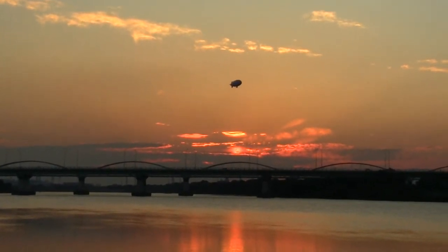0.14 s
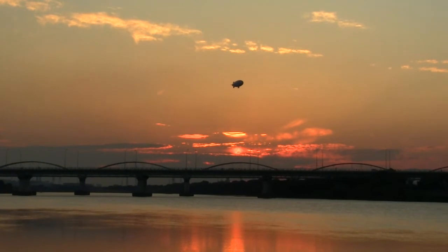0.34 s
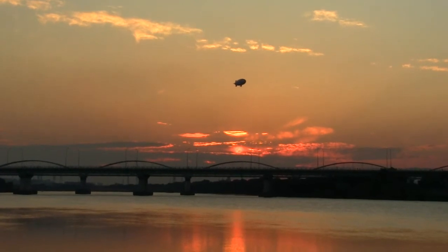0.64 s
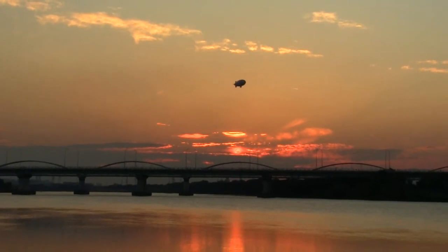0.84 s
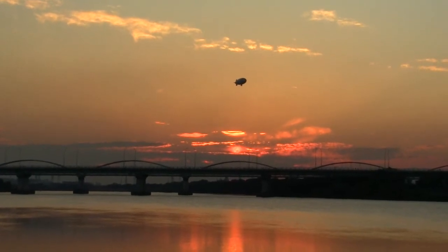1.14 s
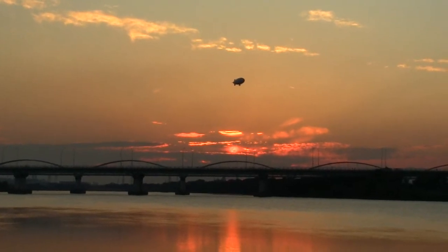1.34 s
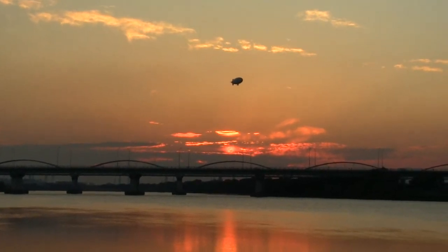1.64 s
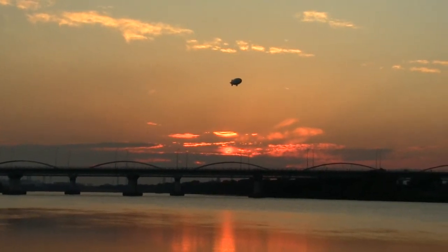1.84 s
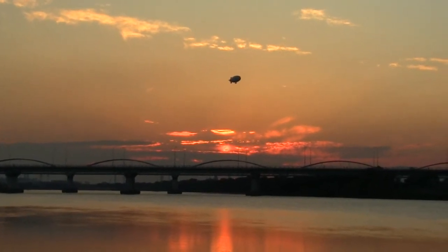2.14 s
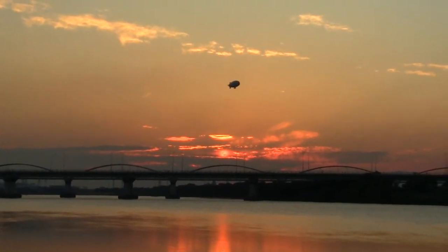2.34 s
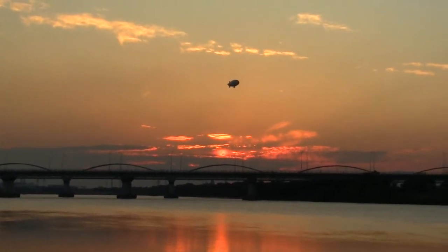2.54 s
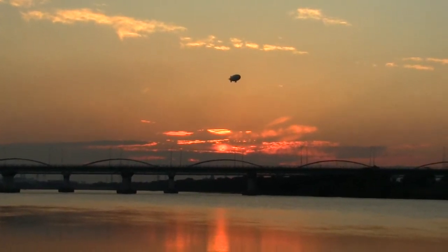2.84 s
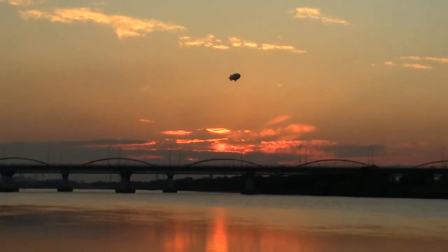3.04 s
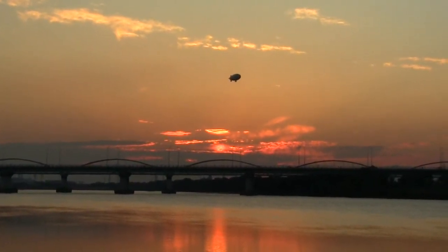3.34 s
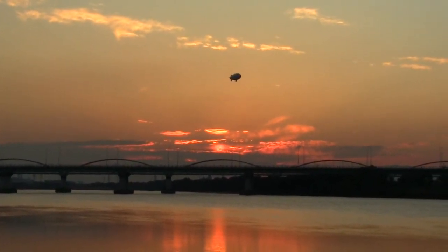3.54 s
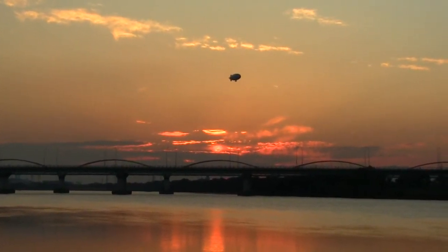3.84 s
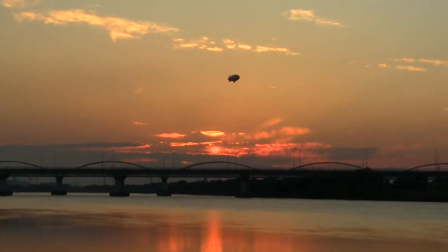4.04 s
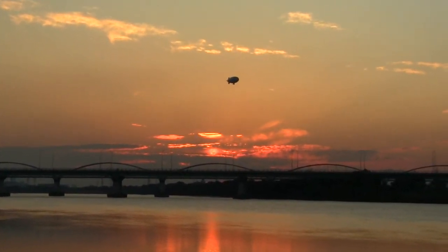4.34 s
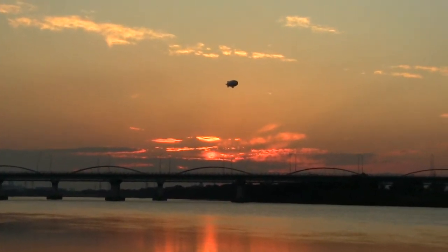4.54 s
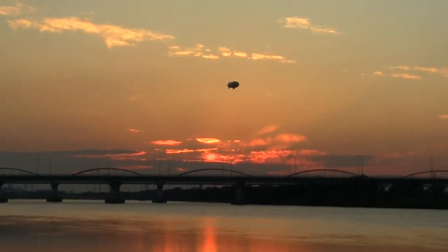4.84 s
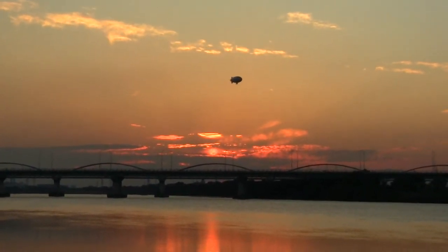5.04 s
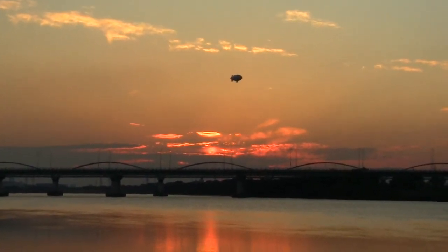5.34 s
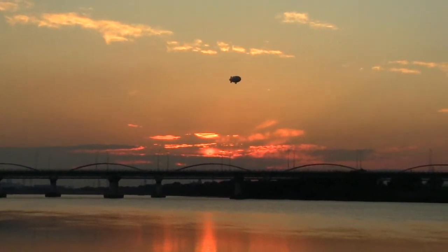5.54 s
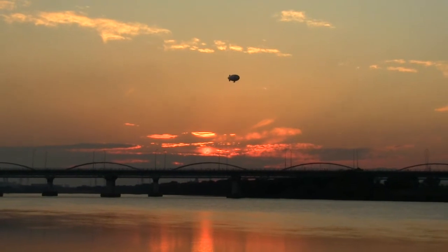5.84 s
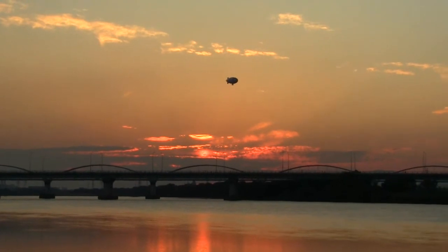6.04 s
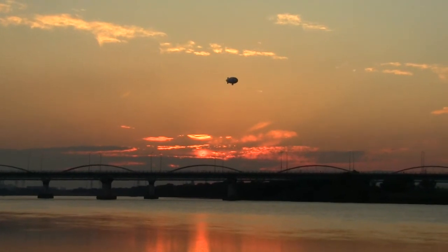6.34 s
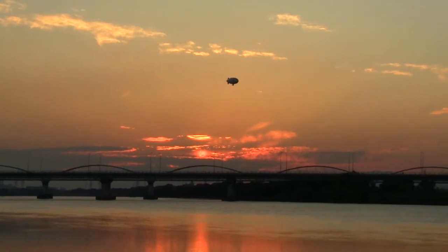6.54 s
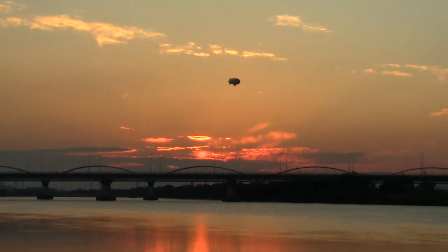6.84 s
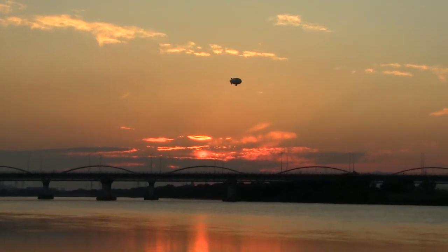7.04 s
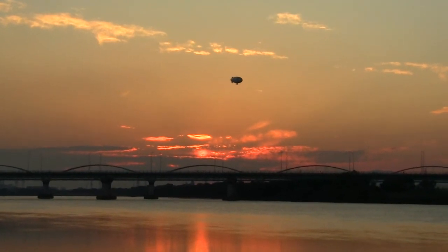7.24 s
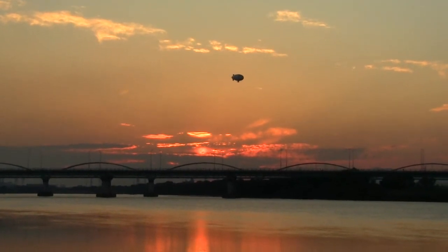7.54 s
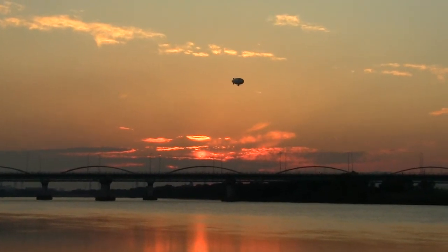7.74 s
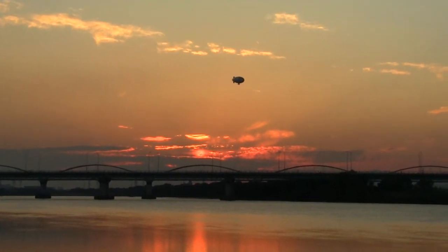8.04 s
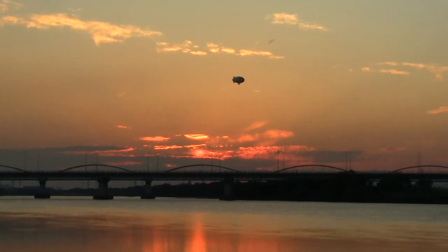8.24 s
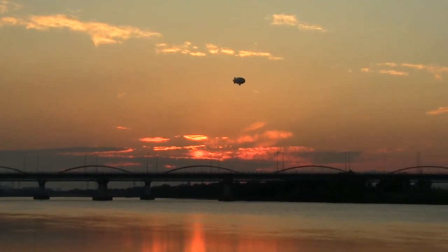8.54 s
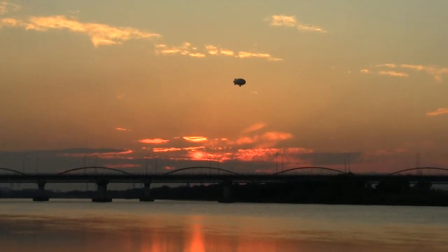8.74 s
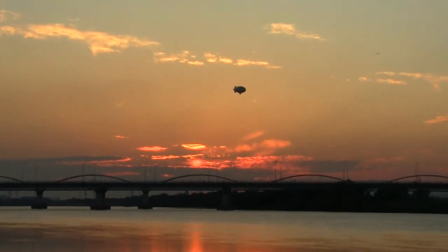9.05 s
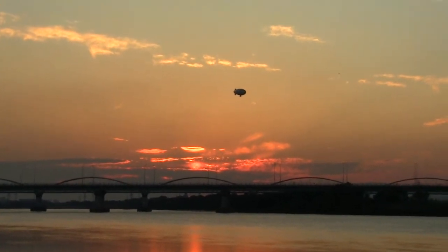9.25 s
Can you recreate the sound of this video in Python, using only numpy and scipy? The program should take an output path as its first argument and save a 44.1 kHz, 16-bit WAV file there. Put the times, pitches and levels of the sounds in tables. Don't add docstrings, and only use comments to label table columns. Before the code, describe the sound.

A constant high insect chorus fills the open evening air from start to finish. Sharp ringing chirps in groups of three or four come from nearby crickets, over a lower rapid trilling and dry, fast ticks. Very quietly below are a fluttering engine drone, a far motor hum passing in the first two seconds, distant rumble, and two dull handling knocks later. Close, almost mono pickup with little echo.

```python
import sys
import numpy as np
from scipy import signal
from scipy.fft import rfft, irfft
from scipy.io import wavfile
from scipy.ndimage import uniform_filter1d, map_coordinates

SR = 44100
rng = np.random.default_rng(int(sys.argv[2]) if len(sys.argv) > 2 else 0)


def volts_from_decibels(level):
    exponent = np.asarray(level, float) / 20
    return 10 ** exponent


def dump_mix(stems):
    frames = np.atleast_2d(stems).T
    limited = np.clip(frames, -1, 1)
    pcm = np.round(limited * 32767).astype(np.int16)
    wavfile.write(sys.argv[1], SR, pcm)


N = 413658

# (time from first full stroke [s], start pitch [Hz], level [dB], pitch fall [Hz])
SONG_MIDDLE = [
    (-.156, 5660, -21, 180),
    (0, 5668, -19.5, 105),
    (.0645, 5672, -19, 90),
    (.129, 5672, -19, 75),
]
SONG_HIGH = [
    (-.131, 5740, -26, 240),
    (0, 5790, -23, 190),
    (.0625, 5790, -22, 170),
    (.125, 5785, -21, 160),
]
SONG_LOW = [
    (-.119, 5545, -30, 190),
    (0, 5560, -25, 80),
    (.062, 5570, -23.5, 70),
    (.124, 5570, -22, 70),
]
SONG_DEEP = [
    (-.15, 5132, -31, 120),
    (0, 5180, -25, 45),
    (.062, 5215, -23, 75),
    (.124, 5225, -22.5, 85),
]
SONG_LEVEL = [
    (-.15, 5250, -30, 85),
    (0, 5285, -27.5, 70),
    (.0635, 5285, -25, 35),
    (.127, 5283, -24, 25),
]
# (time of first full stroke [s], phrase gain [dB], lead stroke gain [dB])
MIDDLE_PHRASES = [(.038, -0.5, 0.0), (.613, -0.5, -1.5), (1.499, -.5, -2.5), (2.101, -1.5, -0.3),
                  (3.326, -0.5, -2.5), (3.915, -1, 0.3), (5.096, -2.2, -5.5), (5.677, -1.3, -1.3),
                  (6.226, -0.3, .4), (7.18, 0.0, -5.5), (7.757, -1.7, -1), (8.358, -4.5, 0.5)]
HIGH_PHRASES = [(.337, -3, -1), (0.938, -1.4, -4.5), (1.548, -1, -1.3), (2.265, 0.1, -5.0), (2.795, 0.8, 3),
                (3.436, -0.1, -2.5), (3.994, -1.3, 2.5), (4.535, 0.8, 2), (5.166, -0.7, -0.3),
                (5.728, -1.3, 1.1), (6.329, -.4, 0.8), (7.004, 0.5, 0.2), (7.697, -1, -1),
                (8.324, 0.1, -3.0), (8.929, 0.7, -0.6)]
LOW_PHRASES = [(-.084, 1.5, 0.0), (1.039, 1.4, -30), (2.177, -5, 3), (2.848, 0.5, -0.5), (3.969, -1, -1),
               (4.654, -0.8, -1), (5.923, 0.6, -5.0), (6.476, -.4, -4), (8.34, -2.5, -5.5)]
DEEP_PHRASES = [
    (.323, -.3, .1),
    (2.089, -0.39, -.9),
    (2.63, -0.33, 2.4),
    (4.274, .3, -0.7),
    (4.831, .6, 1.01),
    (6.608, 0.7, 0.14),
    (7.206, 0.25, .1),
]
LEVEL_PHRASES = [(.326, -3, -4.0), (.944, -0.5, 0.5), (1.279, -12, -27), (2.301, -0.5, -1.5),
                 (2.867, -1.1, -5), (3.45, -0.3, 1.9), (4.865, 0.8, -2), (5.432, 1.5, 2.5),
                 (6.09, -12, -33), (6.931, 0.6, -2), (7.509, 1, -4.0), (9.354, 2, -3)]
# (time [s], start pitch [Hz], level [dB], pitch fall [Hz])
STRAYS = [
    (.922, 5550, -22, 200),
    (1.08, 5680, -23, 120),
    (2.287, 5680, -21, 40),
    (8.525, 5570, -24, 70),
]
# (first stroke [s], last stroke [s], level [dB])
RUNS = [(-.005, .085, -33), (.181, .361, -31.5), (.454, .544, -33), (1.39, 1.665, -32), (1.743, 1.79, -29),
        (1.862, 1.958, -30.5), (2.054, 2.098, -31), (2.587, 2.635, -32), (2.734, 3.055, -32.5),
        (3.154, 3.245, -31), (3.341, 3.382, -30), (3.898, 3.982, -34), (4.072, 4.302, -32),
        (4.394, 4.631, -31), (4.733, 4.778, -30), (5.302, 5.532, -32), (5.628, 5.806, -32.5),
        (5.868, 5.999, -32), (6.988, 7.081, -32), (7.169, 7.543, -32), (7.64, 7.685, -29.5),
        (7.782, 7.825, -33), (8.332, 8.656, -34.5), (8.756, 8.987, -32.5), (9.081, 9.124, -30),
        (9.223, 9.314, -32)]
# (first stroke [s], last stroke [s], level [dB])
DRAWLS = [
    (.889, 1.297, -31.5),
    (2.171, 2.523, -31),
    (3.458, 3.806, -29),
    (4.852, 5.203, -29),
    (6.302, 6.904, -29.5),
    (7.904, 8.241, -29),
]
# (first stroke [s], last stroke [s], level [dB])
SLOW_TRILLER = [
    (0.638, 1.131, -33.5),
    (3.656, 3.8, -33),
    (4.217, 4.505, -34),
    (5.72, 5.79, -36),
    (5.865, 6.003, -23),
    (6.28, 6.9, -34.5),
    (7.959, 8.172, -36),
]
# (first chirp [s], last chirp [s], level [dB])
TICKER = [
    (.052, .052, -32.5),
    (.198, .464, -34),
    (1.535, 1.535, -30),
    (1.643, 2.04, -31.5),
    (2.168, 2.7, -34),
    (4.098, 5.434, -33),
    (6.596, 7.651, -33.5),
    (8.831, 9.36, -31.5),
]
# (frequency shift [Hz], level [dB], blur [ratio])
IMAGES = [
    (3900, -35.5, .35),
    (5200, -53, 4),
    (5480, -54, 4),
    (6850, -41, .5),
    (7840, -45, .5),
]
# (time [s], firing rate [Hz], second order [dB], fourth order [dB])
ENGINE = [
    (0.0, 70.3, -53, -49),
    (0.13, 71.3, -51, -52.5),
    (4.78, 70.46, -55.5, -58),
    (6.19, 71.9, -52, -62.5),
    (9.09, 69.5, -56, -55),
    (9.38, 71.7, -54, -55),
]
# (time [s], pitch [Hz], level [dB])
HUM = [
    (0.3, 470, -55),
    (1.2, 469.7, -57),
    (1.5, 470, -51),
    (2.25, 470, -51),
    (2.35, 468, -62),
]
# (time [s], peak level [dB])
BUMPS = [
    (4.245, -44),
    (9.168, -37),
]
# (time [s], level [dB])
TOWN = [
    (0.0, -46.5),
    (0.81, -46.5),
    (9.38, -48),
]
# (frequency [Hz], density [dB per Hz])
AIR = [(20, -16), (60, -1), (140, -4.5), (480, -7), (1000, -11.5), (1600, -16.5), (2400, -9.5),
       (2800, -6.5), (4300, -14), (4850, -9), (6300, -10.5), (7600, -17.5), (8400, -27.5), (13000, -31)]
# (frequency [Hz], side minus mid [dB])
WIDTH = [
    (60, -5),
    (150, 0),
    (450, 1.5),
    (1300, 5.5),
    (3000, -12),
]


def stroke(hz, fall_hz, length, rise, fade, hook_hz):
    t = np.arange(int(length * SR)) / SR
    end = np.clip(1 - (length - t) / fade, 0, 1)
    shape = np.sin(np.pi / 2 * np.minimum(t / rise, 1)) ** 2 * np.cos(np.pi / 2 * end)
    pitch = hz - fall_hz * t / length - hook_hz * end ** 3
    return shape * np.exp(2j * np.pi * np.cumsum(pitch) / SR)


def strokes(rows, length, rise, fade, hook_hz, wobble_db, stretch=0, sag_db=0):
    out = np.zeros(N + 2 * SR, complex)
    for (s, hz, level_db, fall_hz), luck in zip(rows, rng.standard_normal((len(rows), 8))):
        one = stroke(hz, fall_hz, length + stretch * fall_hz, rise, fade, hook_hz)
        sagging_db = level_db - sag_db * fall_hz * np.linspace(-.4, .6, len(one))
        catch = np.interp(np.linspace(0, 6, len(one)), np.arange(7), luck[1:])
        at = int((s + 1) * SR)
        out[at:at + len(one)] += volts_from_decibels(sagging_db + wobble_db * catch) * one * np.exp(9j * luck[0])
    return out[SR:SR + N]


def phrases(song, rows):
    sag_hz_per_db = 22
    (lead_s, lead_hz, lead_db, lead_fall), *full = song
    leads = [(s + lead_s, lead_hz + sag_hz_per_db * soft_db, lead_db + soft_db, lead_fall)
             for s, _, soft_db in rows]
    rest = [(s + later, hz, level_db + gain_db, fall)
            for s, gain_db, _ in rows for later, hz, level_db, fall in full]
    return leads + rest


def crowd(count, per_s, hz, spread_hz, fall_hz, length, level_db, sway_db):
    out = np.zeros(N + SR, complex)
    for pitch, (pace, start) in zip(np.linspace(-1, 1, count), rng.random((count, 2))):
        at = np.arange(start / per_s, N / SR, 1 / (per_s * (.96 + .08 * pace)))
        sway = np.interp(4 * at, np.arange(40), rng.standard_normal(40))
        gain = volts_from_decibels(level_db + sway_db * sway) * np.exp(9j * rng.random(len(at)))
        one = stroke(hz + spread_hz * pitch, fall_hz, length, rise=.2 * length, fade=.49 * length, hook_hz=40)
        out[(at * SR).astype(int)[:, None] + np.arange(len(one))] += gain[:, None] * one
    return out[:N]


def ringers():
    sung = (STRAYS + phrases(SONG_MIDDLE, MIDDLE_PHRASES) + phrases(SONG_HIGH, HIGH_PHRASES)
            + phrases(SONG_LOW, LOW_PHRASES) + phrases(SONG_DEEP, DEEP_PHRASES)
            + phrases(SONG_LEVEL, LEVEL_PHRASES))
    rows = [(s - .003, hz + 8, level_db + 1.0, 1.212 * fall_hz) for s, hz, level_db, fall_hz in sung]
    near = strokes(rows, length=.054, rise=.007, fade=.02, hook_hz=300, wobble_db=2.0,
                   stretch=.00003, sag_db=.015)
    far = crowd(count=16, per_s=9.0, hz=5810, spread_hz=160, fall_hz=150, length=.05,
                level_db=-47.5, sway_db=3.5)
    far += crowd(count=22, per_s=8.0, hz=5396, spread_hz=283, fall_hz=107, length=.037,
                 level_db=-49.0, sway_db=7.0)
    far += crowd(count=5, per_s=30.0, hz=7150, spread_hz=750, fall_hz=250, length=.02,
                 level_db=-63, sway_db=8)
    return near + far


def runs(rows, gap):
    warm_up_db = -2.5
    out = []
    for first, last, level_db in rows:
        count = round((last - first) / gap) + 1
        for k, s in enumerate(np.linspace(first, last, count)):
            out.append((s, level_db + warm_up_db * np.exp(-k)))
    return out


def trillers():
    sung = runs(RUNS, gap=.046) + runs(DRAWLS, gap=.069)
    luck = rng.standard_normal((len(sung), 2))
    low = [(s - .005, 3915 + 30 * v, level_db + 4.0 + 1.1 * w, 380)
           for (s, level_db), (v, w) in zip(sung, luck)]
    high = [(s - .004, 4150, level_db, 600)
            for first, last, level_db in SLOW_TRILLER for s in np.arange(first, last + .03, .07)]
    near = strokes(low + high, length=.0382, rise=.0086, fade=.014, hook_hz=60, wobble_db=-1.5)
    weak = crowd(count=5, per_s=22.0, hz=3800, spread_hz=80, fall_hz=280, length=.03,
                 level_db=-46.5, sway_db=2.2)
    fast = crowd(count=18, per_s=43.0, hz=3344.4, spread_hz=70.7, fall_hz=231, length=.0166,
                 level_db=-39.5, sway_db=3.0)
    single = crowd(count=1, per_s=33.0, hz=3750, spread_hz=0, fall_hz=230, length=.022,
                   level_db=-36, sway_db=1.5)
    return near + weak + fast + single


def ticker():
    chirps = runs(TICKER, gap=.133)
    rows = [(s + .0142 * k - .003, 5480, level_db, 1200) for s, level_db in chirps for k in range(4)]
    return strokes(rows, length=.012, rise=.003, fade=.008, hook_hz=50, wobble_db=3)


def grass(x, t60, level_db):
    t = np.arange(int(.3 * SR)) / SR
    tail = rng.standard_normal(len(t)) * volts_from_decibels(-60 * t / t60)
    return x + volts_from_decibels(level_db) * signal.fftconvolve(x, tail / np.linalg.norm(tail))[:N]


def recorder_images(loud):
    t = np.arange(N) / SR
    shiver = drift(220) + 1j * drift(200)
    shifts = sum(volts_from_decibels(level_db) * (1 + blur * shiver) * np.exp(2j * np.pi * hz * t)
                 for hz, level_db, blur in IMAGES)
    deep = signal.sosfilt(signal.ellip(6, 1, 28, 5230, fs=SR, output="sos"), loud)
    overtone = volts_from_decibels(-12) * deep ** 2 * (1 + .4 * shiver)
    mirror = volts_from_decibels(-41) * np.conj(deep) * np.exp(2j * np.pi * 16980 * t)
    return loud * shifts + overtone + mirror


def airship():
    t = np.arange(N) / SR
    s, hz, second_db, fourth_db = np.transpose(ENGINE)
    turn = 2 * np.pi * np.cumsum(np.interp(t, s, hz) + .295 * drift(5.0)) / SR
    even = volts_from_decibels(np.interp(t, s, second_db)) * np.sin(2 * turn)
    even += volts_from_decibels(np.interp(t, s, fourth_db)) * np.sin(4 * turn)
    even *= volts_from_decibels(2.5 * drift(6.0) - 1)
    rest = sum(volts_from_decibels(level_db + 3 * drift(2.5)) * np.sin(k * turn)
               for k, level_db in zip((1, 3, 5, 6), (-65, -61, -63, -65)))
    return np.sqrt(2) * (even + rest)


def passing_motor():
    t = np.arange(N) / SR
    s, hz, level_db = np.transpose(HUM)
    turn = 2 * np.pi * np.cumsum(np.interp(t, s, hz)) / SR
    return np.sqrt(2) * volts_from_decibels(np.interp(t, s, level_db, -99, -99)) * np.sin(turn)


def bumps():
    t = np.arange(N) / SR
    hz, length_s = 58, .037
    out = np.zeros(N)
    for s, peak_db in BUMPS:
        hump = np.sin(np.pi * np.clip((t - s) / length_s, 0, 1))
        out += volts_from_decibels(peak_db) * np.sin(2 * np.pi * hz * (t - s)) * hump
    return out


def town_air():
    t = np.arange(N) / SR
    level = volts_from_decibels(np.interp(t, *np.transpose(TOWN)) + 6.5)
    wide = [(hz, level_db + at_hz(WIDTH, hz)) for hz, level_db in AIR]
    mid = level * volts_from_decibels(.5 * drift(3.09)) * coloured(AIR)
    side = level * volts_from_decibels(-21 + 2.4 * drift(3.5)) * coloured(wide)
    return mid, side


def at_hz(points, hz):
    return np.interp(np.log(hz), np.log(np.array(points)[:, 0]), np.array(points)[:, 1])


def coloured(points):
    hz = np.maximum(np.fft.rfftfreq(N, 1 / SR), 1)
    x = irfft(rfft(rng.standard_normal(N)) * volts_from_decibels(at_hz(points, hz)), N)
    return x / np.std(x)


def drift(rate):
    knots = rng.standard_normal(int(N / SR * rate) + 3)
    return map_coordinates(knots, [np.arange(N) / SR * rate], order=3)


def masked_out(x, near_db, far_db, slope_db):
    hz, _, frames = signal.stft(x, SR, nperseg=2048)
    rows = np.arange(len(hz)) // 8
    power = np.add.reduceat(np.abs(frames) ** 2, np.arange(0, len(hz), 8))
    power = uniform_filter1d(power, size=3, axis=1)
    band_db = 10 * np.log10(power + 1e-20)
    apart = np.abs(np.arange(len(power))[:, None] - power.argmax(axis=0))
    band_db += 5 * uniform_filter1d(rng.standard_normal(power.shape), size=5, axis=1)
    hidden = band_db < band_db.max(axis=0) + np.maximum(near_db - slope_db * apart, far_db)
    return signal.istft(frames * ~hidden[rows], SR, nperseg=2048)[1][:N]


def scene():
    loud = grass(ringers() + ticker(), t60=.1, level_db=-14)
    low = grass(trillers(), t60=.15, level_db=-22.0)
    insects = (loud + recorder_images(loud) + low).real
    hum = passing_motor()
    air_mid, air_side = town_air()
    mid = insects + airship() + hum + bumps() + air_mid
    side = air_side + .13 * hum
    return np.array([mid + side, mid - side])


def band_limit(x):
    return signal.sosfilt(signal.butter(12, 13780, fs=SR, output="sos"), x)


def record(dry):
    mid, side = (dry[0] + dry[1]) / 2, (dry[0] - dry[1]) / 2
    mid = masked_out(mid, near_db=-31.5, far_db=-48, slope_db=1.3)
    mid = signal.sosfilt(signal.cheby2(14, 35, 13850, fs=SR, output="sos"), mid)
    side = masked_out(side, near_db=-3, far_db=-5, slope_db=.3)
    return band_limit(np.array([mid + side, mid - side]))


dry = scene()
out = record(dry)
dump_mix(out)
```